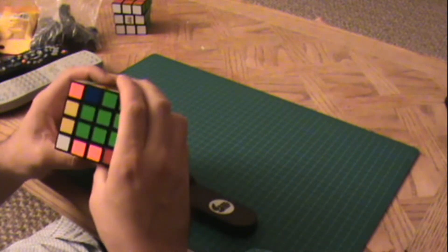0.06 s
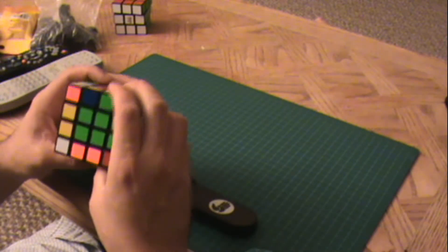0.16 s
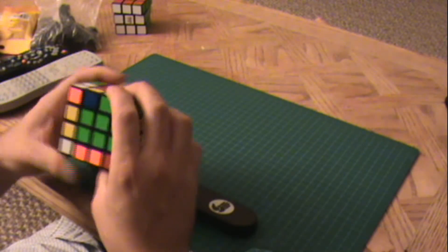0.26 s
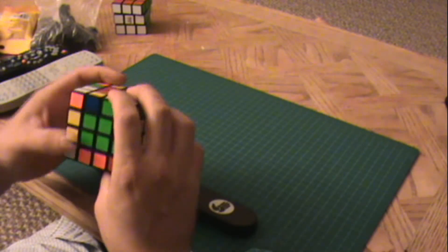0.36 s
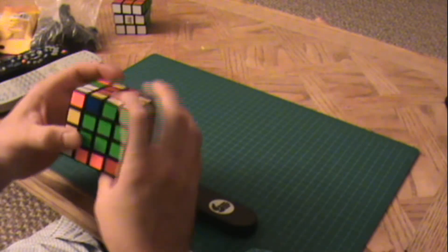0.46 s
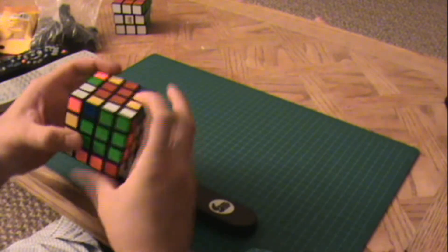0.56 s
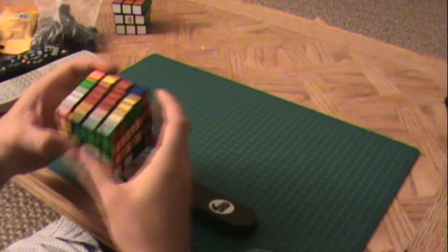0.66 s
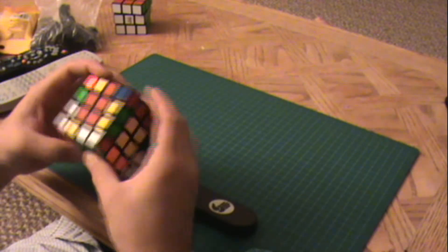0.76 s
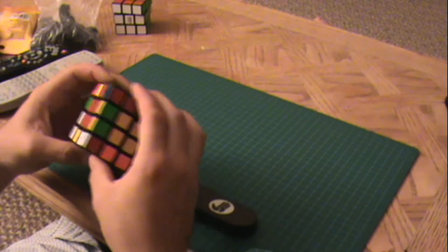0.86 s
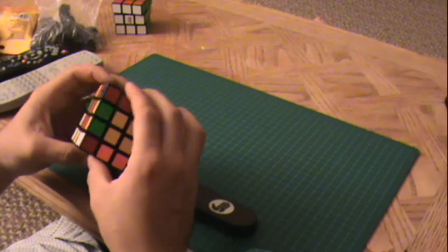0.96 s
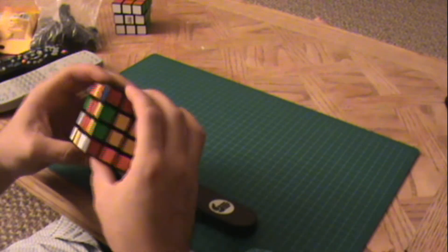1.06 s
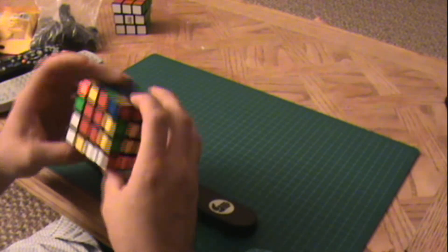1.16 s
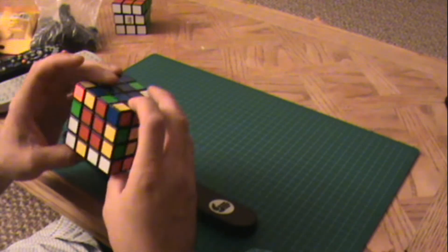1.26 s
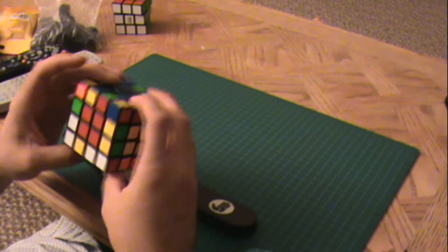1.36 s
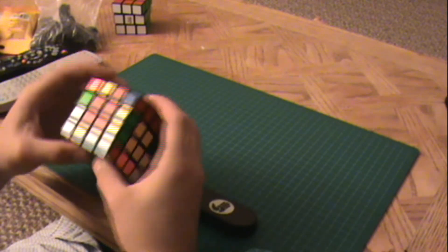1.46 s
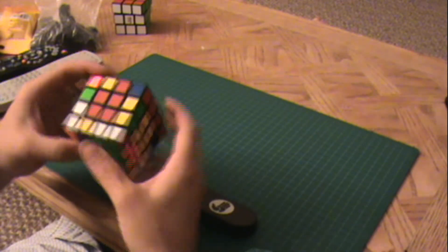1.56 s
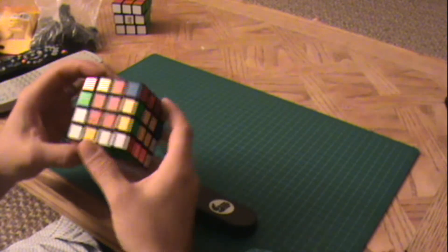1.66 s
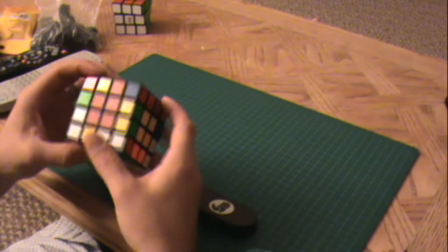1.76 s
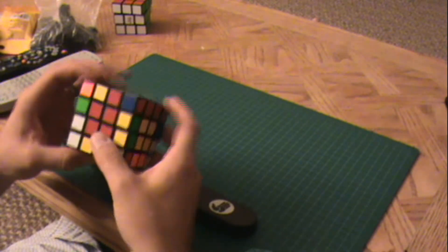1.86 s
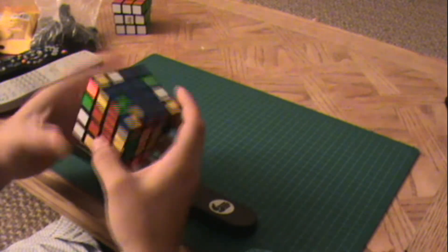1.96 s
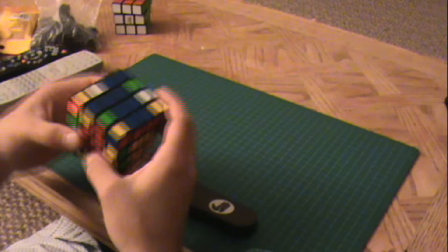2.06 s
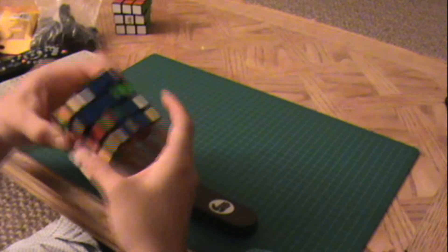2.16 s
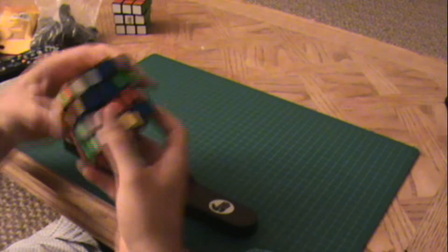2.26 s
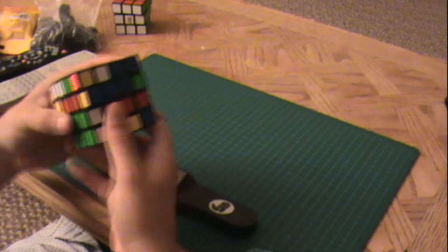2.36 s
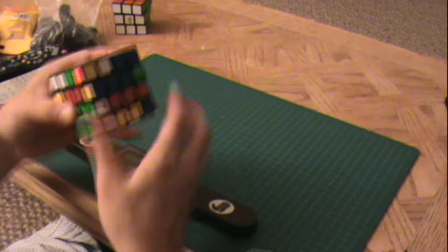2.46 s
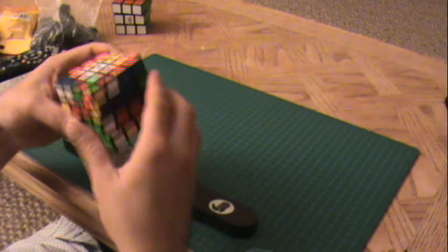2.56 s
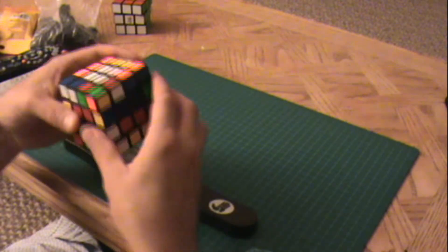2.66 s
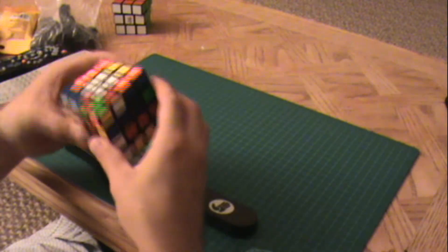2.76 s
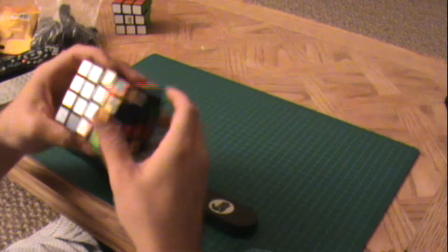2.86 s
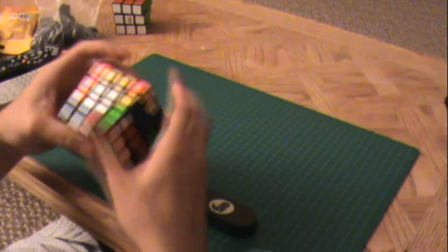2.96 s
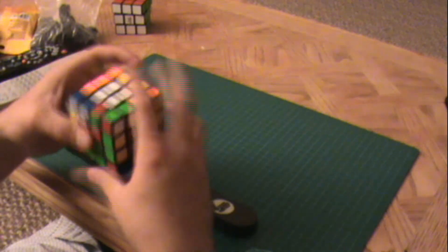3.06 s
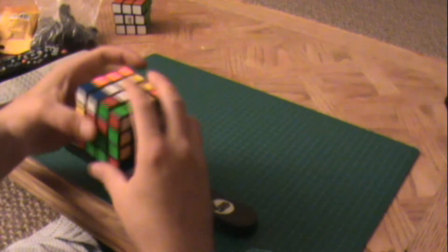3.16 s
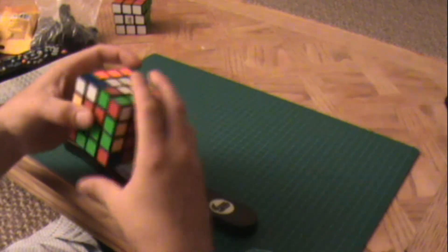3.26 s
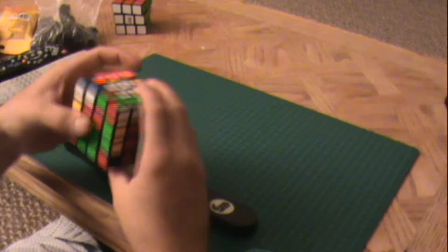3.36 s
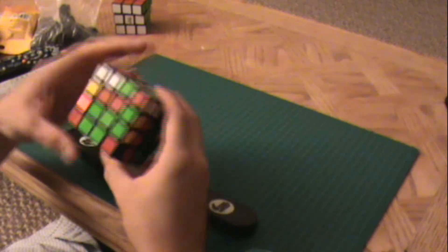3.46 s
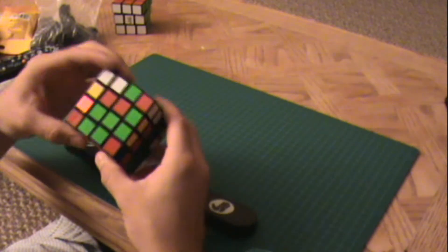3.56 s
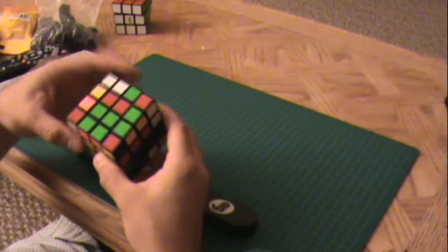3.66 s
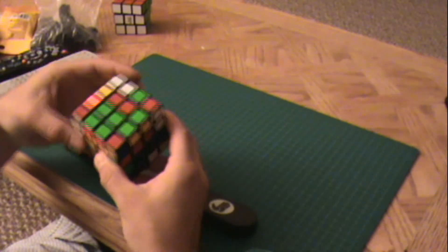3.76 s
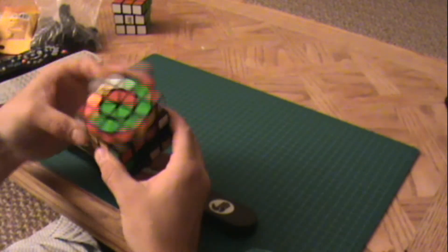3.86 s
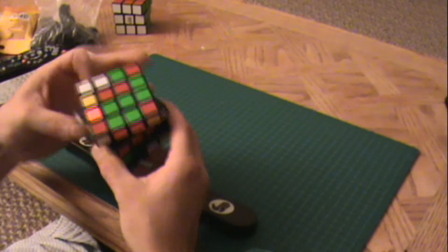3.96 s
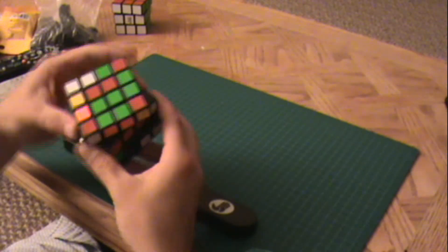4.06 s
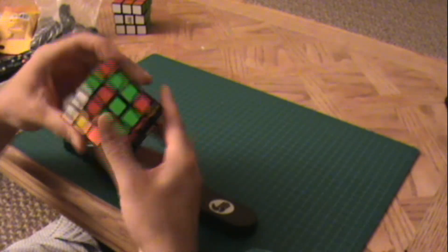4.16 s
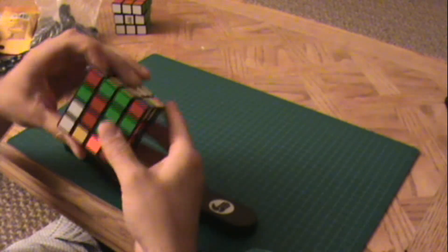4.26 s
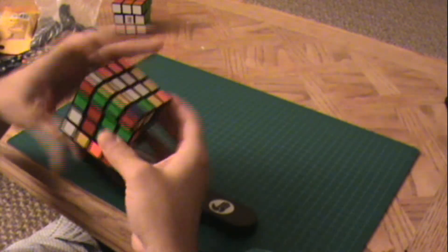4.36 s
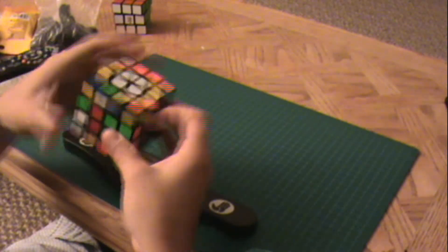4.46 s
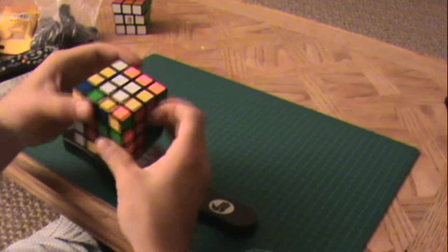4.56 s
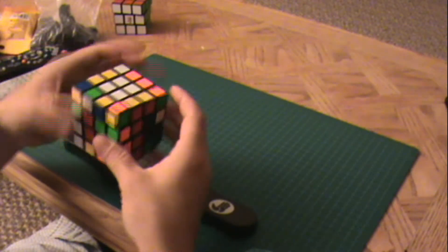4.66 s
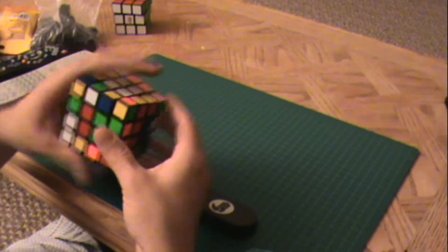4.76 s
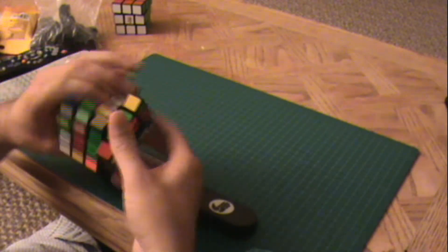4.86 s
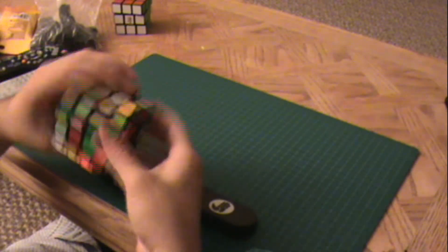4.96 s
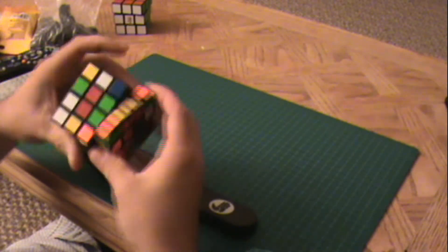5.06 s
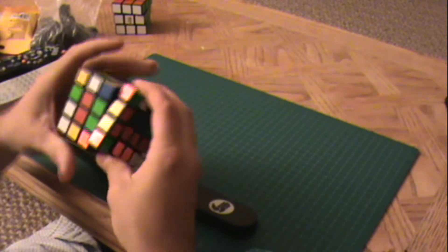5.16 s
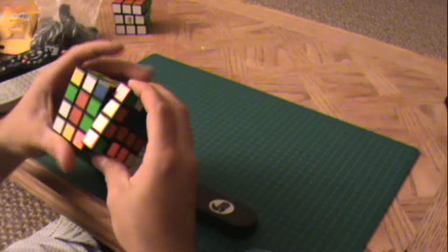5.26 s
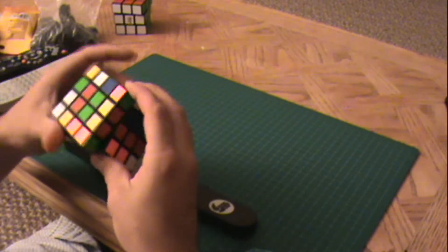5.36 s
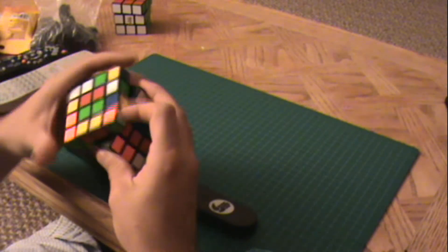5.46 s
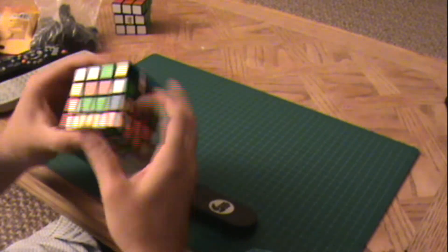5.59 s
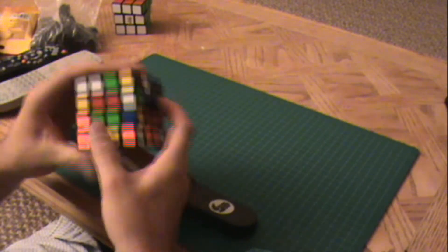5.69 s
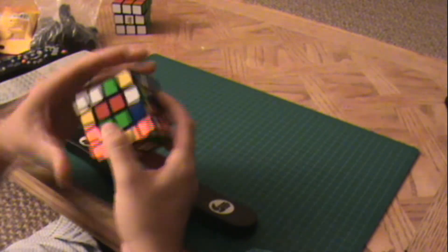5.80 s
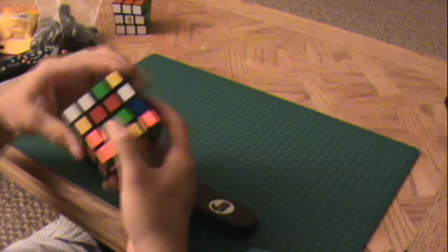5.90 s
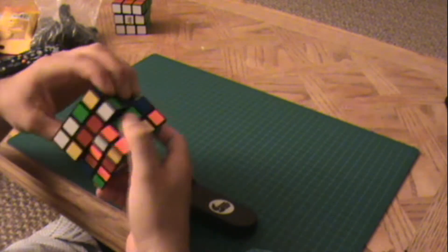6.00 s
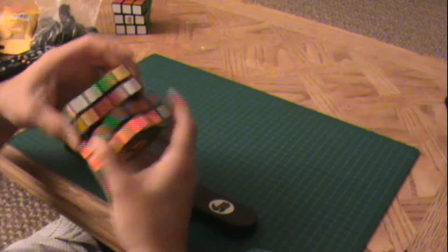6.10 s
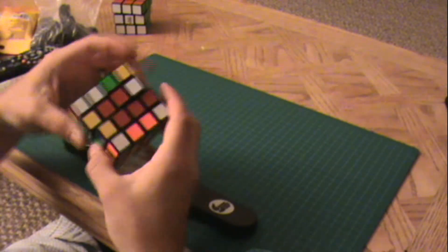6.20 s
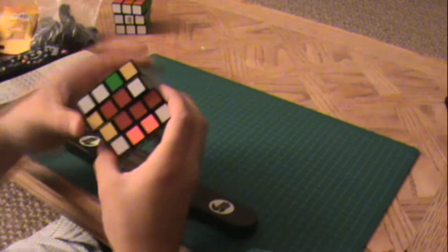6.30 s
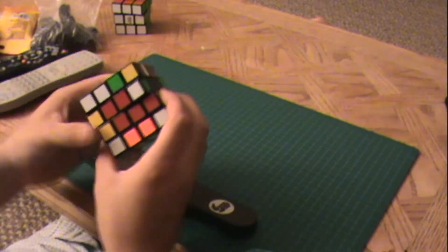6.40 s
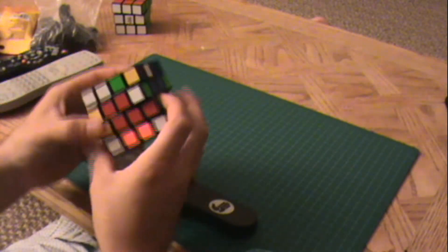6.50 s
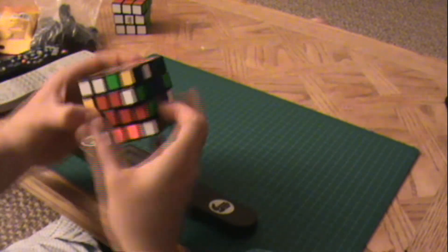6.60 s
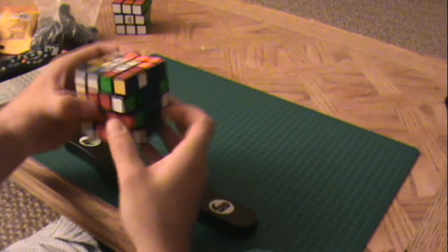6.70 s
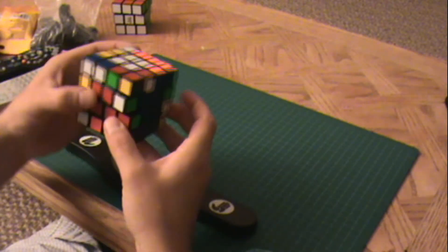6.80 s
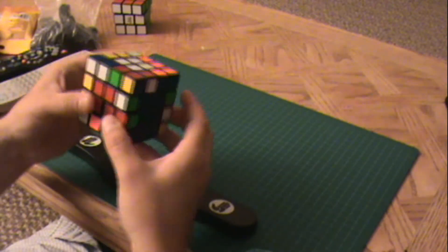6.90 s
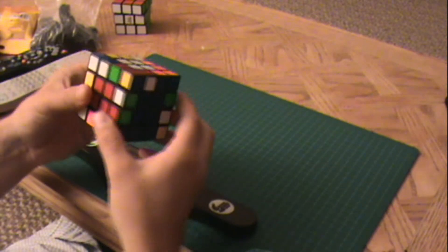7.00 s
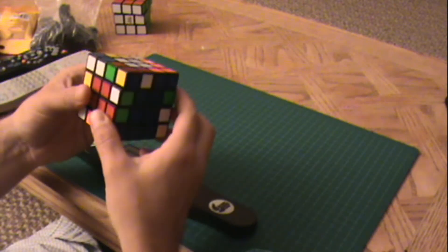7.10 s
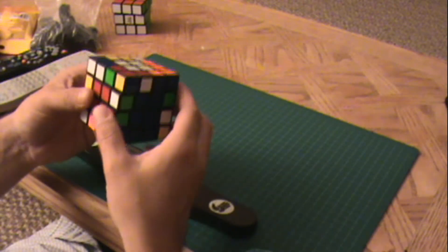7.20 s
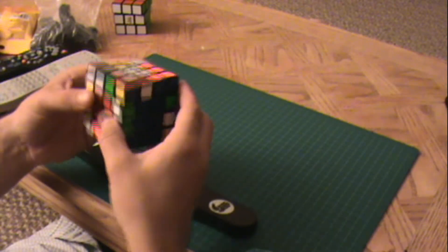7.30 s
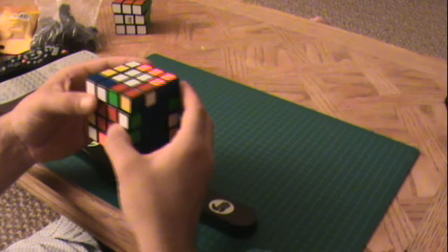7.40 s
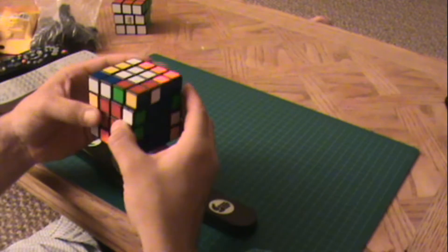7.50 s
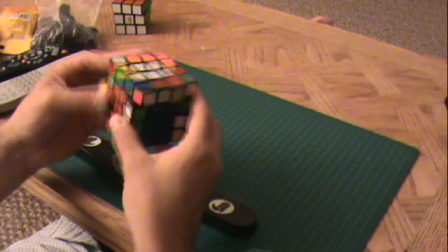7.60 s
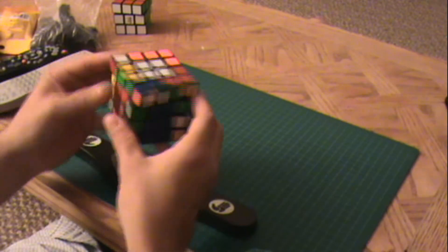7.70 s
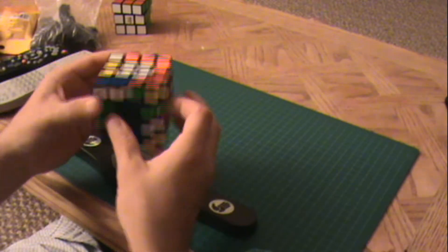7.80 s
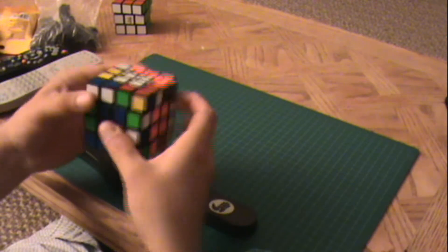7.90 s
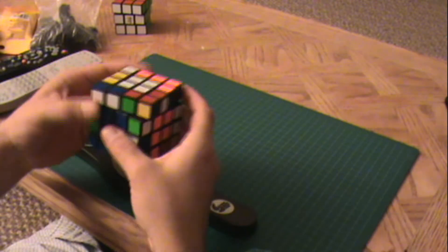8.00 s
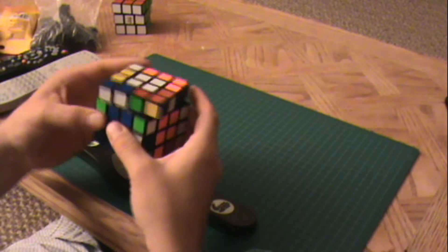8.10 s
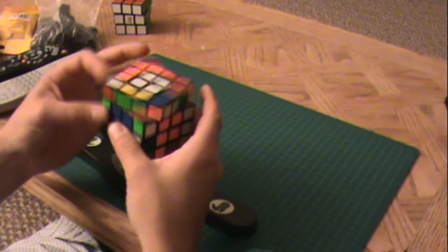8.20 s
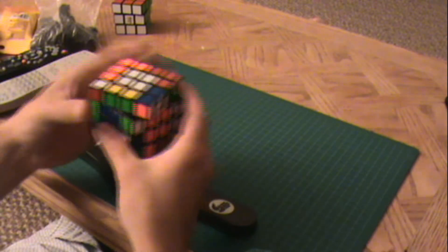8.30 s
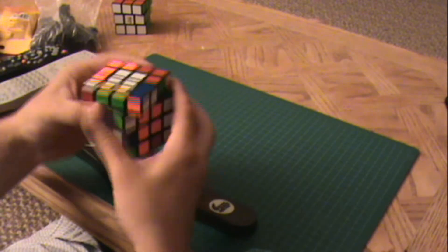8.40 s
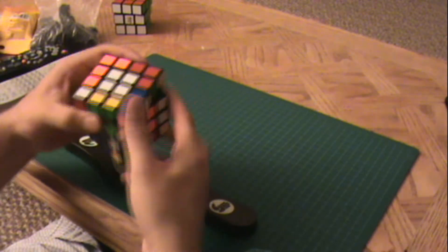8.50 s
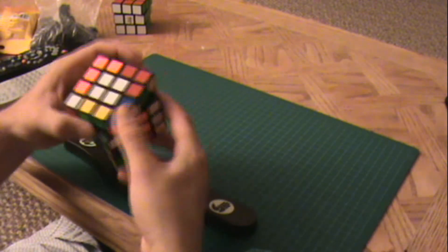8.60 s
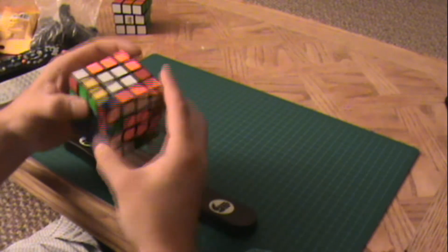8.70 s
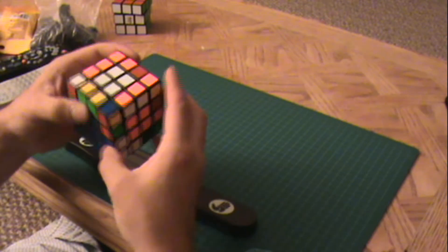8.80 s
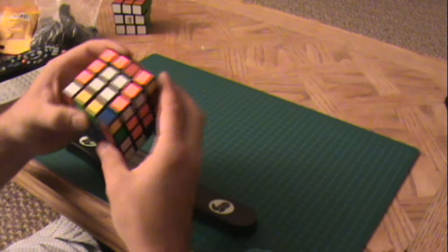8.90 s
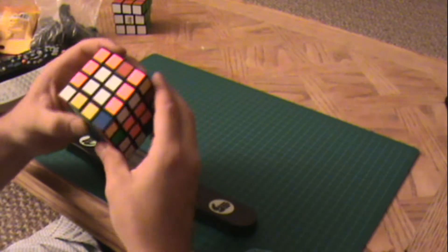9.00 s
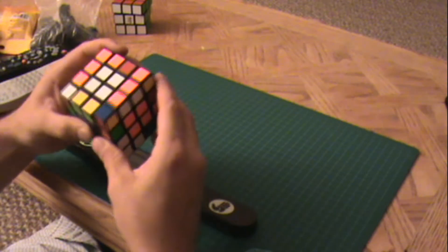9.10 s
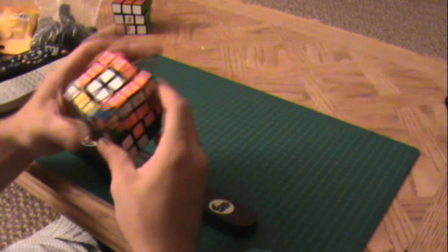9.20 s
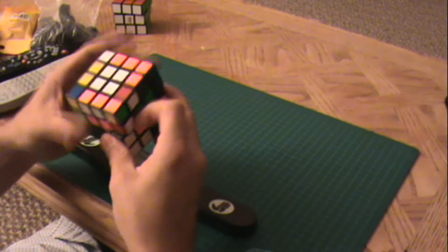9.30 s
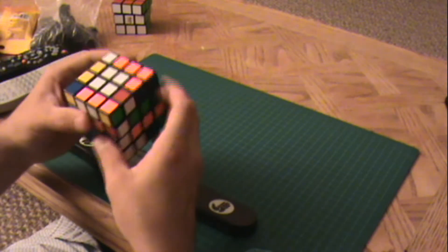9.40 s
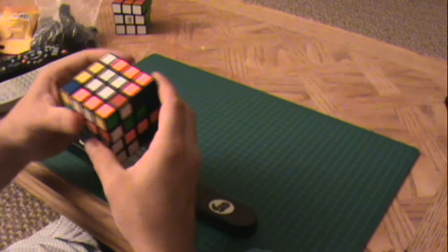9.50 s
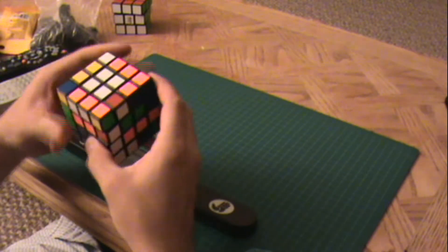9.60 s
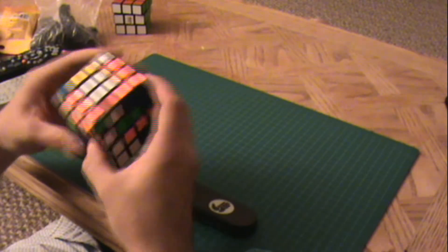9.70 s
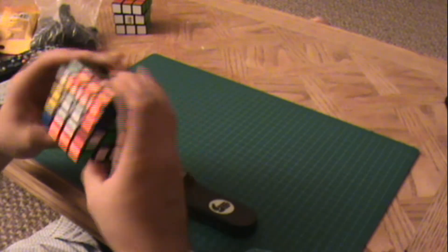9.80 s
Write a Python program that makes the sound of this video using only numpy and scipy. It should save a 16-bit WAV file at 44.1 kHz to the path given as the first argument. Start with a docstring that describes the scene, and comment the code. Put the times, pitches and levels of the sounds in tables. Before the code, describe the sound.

A plastic puzzle cube is turned by hand close to a camcorder, slightly left of centre, in a quiet room. From 0 to 1.9 s there are only light ticks, soft finger drags and small clicks, with a clearer snap at 0.77. Quick clacks gather at 2.0-2.25, then a hard rattling cluster hits at 2.85-2.92. Smaller snaps follow at 3.15-3.45, and a strong pair at 3.97. From 4.5 to 6.2 turns come fast: dense scrapes ending in sharp hollow snaps, loudest around 4.5, 5.06 and 6.15. From 6.3 to 7.6 it is nearly still, with faint loose ticking. Crisp bursts return at 7.65, 8.25 and 8.75, with a tiny pitched ring on a click at 8.49, then a lighter rattle at 9.3 and small clicks to the end. Short reflections follow; faint hum, hiss and a very high thin whine continue throughout.

```python
"""Two hands turn the layers of a plastic puzzle cube in quick runs, close to a camcorder in a quiet room.
Hollow pieces scrape, catch and snap: short noise bursts coloured like plastic, a few with a brief pitched ring.
Between the snaps, layers tick and rub (many tiny noise grains) and fingers drag softly (dull noise).
Echoes and a diffuse tail answer from the table and walls, over low hum, hiss and a thin high whine."""
import sys
import numpy as np
from scipy import signal
from scipy.fft import rfft, irfft, next_fast_len
from scipy.io import wavfile
from scipy.ndimage import uniform_filter1d

SR = 44100
rng = np.random.default_rng(int(sys.argv[2]) if len(sys.argv) > 2 else 0)


def dump_mix(stems):
    """Bounce the given channels to the path in sys.argv[1] as a 16-bit WAV at rate SR."""
    frames = np.atleast_2d(stems).T  # one column per channel
    limited = np.clip(frames, -1, 1)  # hard clip at full scale
    pcm = np.round(limited * 32767).astype(np.int16)
    wavfile.write(sys.argv[1], SR, pcm)


N = 434385

# colour of the plastic pieces: [f/Hz, gain/dB]
PLASTIC_COLOUR = [(130, -23), (200, -16), (310, -4), (500, 0.5), (800, 1.5), (1100, -1.5), (2000, -2.5),
                  (3200, -2), (5000, 0.5), (7000, -2.5), (8800, -4.5), (11000, -9.5), (15500, -24)]


def undb(db):
    """Turn decibels into a gain."""
    return 10 ** (np.asarray(db) / 20)


def level(x, db):
    """Set the rms level (the average strength) in dB."""
    return x * undb(db) / np.sqrt(np.mean(x ** 2))


def response(hz, points):
    """Gain at the given frequencies, joined between [f/Hz, gain/dB] points."""
    f, db = np.transpose(points)
    return undb(np.interp(np.log(hz + 1), np.log(f), db))


def colour(x, points):
    """Make some frequencies stronger and others weaker, following [f/Hz, gain/dB] points."""
    length = x.shape[-1]
    n = next_fast_len(length)
    hz = np.arange(n // 2 + 1) * SR / n
    return irfft(rfft(x, n) * response(hz, points), n)[..., :length]


def walk(rate):
    """Smooth random wandering, with about `rate` new random values a second."""
    hold = int(SR / rate)
    values = rng.standard_normal(N // hold + 1)
    return uniform_filter1d(np.repeat(values, hold), hold)[:N]


def stereo(mid, side, side_db):
    """Left and right from a shared part and a part with opposite signs."""
    return mid + undb(side_db) * side * np.array([[1], [-1]])


def fade(t, t60):
    """Silent before t = 0, then dying away by 60 dB in t60 seconds."""
    return (t >= 0) * np.exp(-np.log(1000) * np.abs(t) / t60)


def add(track, s, sound):
    """Mix a sound into a track at s seconds."""
    start = max(int(s * SR), 0)
    part = track[..., start:start + sound.shape[-1]]
    part += sound[..., :part.shape[-1]]


def tone(hz, db, unsteady, waver_rate=9):
    """A steady tone that wavers in level and phase."""
    waver = 1 + unsteady * (walk(waver_rate) + 1j * walk(waver_rate))
    turning_phase = np.exp(2j * np.pi * hz * np.arange(N) / SR)
    return level(np.real(waver * turning_phase), db)


def background(side_db=-6):
    """Room air and hum shared by both microphone ports, plus hiss and a wavering whine of each port's own."""
    # still room and microphone hiss: [f/Hz, gain/dB]
    air_colour = [(25, -12.5), (55, 2), (70, -1.5), (95, -7.5), (160, -9), (350, -10), (500, -15.5),
                  (800, -13.5), (1240, -14), (2500, -16.5), (5000, -22), (9800, -24.5), (15000, -23.5)]
    # appliance hum: [f/Hz, rms level/dB, unsteadiness 0-1]
    hum_tones = [(70, -66.5, 0.28), (119.6, -68.5, 0.07), (348, -73.5, 0.08), (403, -74, 0.33)]
    air_db = -59.5
    whine_hz, whine_db = 15735, -63.5
    mid, side = level(colour(rng.standard_normal((2, N)), air_colour), air_db)
    side = colour(side, [(100, -5.5), (200, 3.5), (700, 12.5), (2000, 9.5), (8000, 4.5), (14000, 3.0)])
    hum = sum(tone(hz, db, unsteady) for hz, db, unsteady in hum_tones)
    whine = np.array([tone(whine_hz, whine_db, unsteady=1.0, waver_rate=14) for _ in range(2)])
    return stereo(mid, side, side_db) + hum + whine


def reflections(t60=0.26, bass_t60=0.54, bass_db=-3, tail_db=-3, build_s=0.0016, side_db=-6):
    """The room's answer for one position of the cube: a few hard echoes, then a diffuse tail whose bass lingers."""
    # first echoes from the table and nearby walls: [delay/s, gain/dB, upper edge/Hz]
    first_echoes = [(.0086, -17, 14000), (0.0095, -17.5, 9100), (0.0117, -20, 9000), (0.0171, -13, 2500),
                    (0.0215, -16, 6000), (0.0256, -26, 8900)]
    # colour of the main tail: [f/Hz, gain/dB]
    tail_colour = [(120, -9), (320, -4.5), (800, 3.5), (1500, 4.5), (4000, 3), (8500, 4), (12000, -1),
                   (16000, 9.5)]
    t = np.arange(SR // 2) / SR
    air, bass = rng.standard_normal((2, 2, len(t)))
    tails = colour(air, tail_colour) * fade(t, t60)
    tails += colour(bass, [(330, bass_db), (1500, -48)]) * fade(t, bass_t60)
    # the tail starts 6 ms late and builds up quickly
    tails *= np.clip((t - .006) / build_s, 0, 1)
    tails *= undb(tail_db) / np.sqrt(np.sum(tails ** 2, axis=1, keepdims=True))
    paths = stereo(tails[0], tails[1], side_db)
    for delay, db, edge_hz in first_echoes:
        # a one-pole low-pass dulls each echo above its upper edge
        pole = np.exp(-2 * np.pi * edge_hz / SR)
        add(paths, delay, undb(db) * (1 - pole) * pole ** np.arange(SR // 1000))
    return paths


def room(radiated, count=20):
    """The hands keep moving and tilting the cube, so each short stretch meets a different tail."""
    out = np.zeros((2, N))
    for stretch in np.array_split(np.arange(N), count):
        answer = signal.oaconvolve(radiated[None, stretch], reflections(), axes=1)
        add(out, stretch[0] / SR, answer)
    return out


def ports(sound, left_db=1.6, lead_db=-6):
    """The cube is left of centre: the left port is a little louder and leads in the low middle."""
    # a quarter-cycle shift at every frequency, added with opposite signs, moves the two ports apart in time
    turned = -np.imag(signal.hilbert(sound.mean(axis=0), next_fast_len(N)))[:N]
    lead = colour(turned, [(150, -9), (550, -1.5), (1050, -3.5), (3000, -8), (10000, -10)])
    return stereo(sound, lead, lead_db) * undb(np.array([[left_db], [-left_db]]) / 2)


def strokes(rows, attack_s, swell_db, t60):
    """Strength of hand movements: each sets in, changes by swell_db over its length, then dies away."""
    power = np.zeros(N)
    for start, length, db in rows:
        t = np.arange(int((length + t60) * SR)) / SR
        attack = np.minimum(t / attack_s, 1)
        push = undb(db + swell_db * np.minimum(t / length - 1, 0))
        release = fade(np.maximum(t - length, 0), t60)
        add(power, start, (attack * push * release) ** 2)
    return np.sqrt(power)


def fingers(flutter_db=4):
    """Skin drags on the cube in soft, dull, uneven strokes."""
    # the fingers take a new hold: [start/s, length/s, relative level/dB]
    new_holds = [(.55, 0.3, -58.5), (1.15, 0.21, -69), (2.45, 0.63, -75), (4.15, 0.49, -65.5),
                 (8.0, 0.35, -68), (8.85, 0.3, -73)]
    hold_db = -72.5  # a faint drag that never stops
    skin = colour(rng.standard_normal(N),
                  [(100, -9), (200, -11), (320, -2.0), (600, -5), (1300, -18.0), (9000, -58)])
    uneven = level(skin * undb(flutter_db * walk(25)), 0)
    return uneven * (strokes(new_holds, attack_s=0.054, swell_db=2, t60=0.66) + undb(hold_db))


def sliding(tick_rate, spread_db, tick_t60, rub_db, slide_db):
    """Layers slide over each other: tiny slips of very unequal size, each with a short ring, over a fine rub."""
    happens = rng.random(N) < tick_rate / SR  # tick_rate slips a second on average
    slips = happens * undb(spread_db * np.minimum(rng.exponential(size=N), 3))
    # every slip leaves a short fading trail of power
    keep = np.exp(-2 * np.log(1000) / (tick_t60 * SR))
    power = signal.lfilter([1], [1, -keep], slips ** 2)
    strength = np.sqrt(power / power.mean() + undb(rub_db) ** 2)
    grain = strength * rng.standard_normal(N)
    return level(colour(grain, PLASTIC_COLOUR), slide_db)


def nudging():
    """Slow shifts give sparser, duller ticks; the loose pieces are never quite still."""
    # the layers are nudged into line and tick loosely: [start/s, length/s, relative level/dB]
    nudges = [(.24, 0.087, -56.5), (.53, 0.18, -61), (1.55, .16, -58), (2.0, 0.25, -55), (2.4, 0.24, -51.5),
              (2.68, 0.15, -57), (3.17, 0.14, -60), (3.62, 0.31, -54), (4.05, 0.14, -57.5),
              (4.19, 0.13, -50.5), (4.39, 0.06, -48), (4.63, .11, -50.5), (4.9, 0.15, -50.5),
              (5.51, 0.14, -48.5), (6.46, 0.12, -59.5), (6.7, .19, -61), (6.97, 0.073, -53),
              (7.3, .08, -67), (7.5, 0.3, -55), (7.81, .31, -58), (8.4, 0.066, -51.5), (8.65, 0.049, -47),
              (8.95, 0.218, -61.5), (9.16, 0.15, -59), (9.38, 0.06, -46.5), (9.58, .15, -55)]
    loose_db = -64.5  # ticking that never stops
    ticks = sliding(tick_rate=230, spread_db=5.0, tick_t60=0.012, rub_db=-11, slide_db=-1)
    ticks = colour(ticks, [(700, 1.5), (3000, -1.5), (9000, -5.5)])
    return ticks * (strokes(nudges, attack_s=0.0035, swell_db=-2.5, t60=0.066) + undb(loose_db))


def turning():
    """A fast turn drags the pieces past each other in a dense rattle."""
    # a layer is flicked round and scrapes harder until it seats: [start/s, length/s, relative level/dB]
    turns = [(1.92, 0.032, -46), (2.205, 0.047, -36.5), (2.86, 0.075, -33.5), (3.89, 0.071, -39.5),
             (4.484, 0.051, -32), (4.85, 0.033, -37.5), (5.05, 0.062, -31), (5.39, 0.048, -39.5),
             (5.63, 0.032, -39.5), (5.745, 0.046, -40), (5.96, 0.057, -34), (6.135, 0.04, -34),
             (7.64, 0.064, -35), (8.22, 0.041, -32.5), (8.72, 0.038, -33), (9.29, 0.06, -36)]
    rattle = sliding(tick_rate=520, spread_db=4.5, tick_t60=0.0065, rub_db=-8, slide_db=1.5)
    return rattle * strokes(turns, attack_s=.006, swell_db=6.5, t60=0.16)


def contact(t, snap_t60, ring_t60=0.084, ring_db=-17, rebound=0.75, play_s=.0042,
            scrape_db=-22, scrape_t60=0.027, count=4):
    """Spectrum of one contact: an edge scrapes up to the catch, snaps, and chatters a few times in its play."""
    late, force = rng.random((2, count, 1))
    power = fade(t, snap_t60) ** 2
    power += (undb(ring_db) * fade(t, ring_t60)) ** 2
    chatter = rebound * force * fade(t - late ** 2 * play_s, snap_t60)
    power += np.sum(chatter ** 2, axis=0)
    # time runs backwards here, so the scrape grows towards the catch
    power += (undb(scrape_db) * fade(-t, scrape_t60)) ** 2
    # the many interlocked pieces have modes so dense and damped that they ring as noise
    burst = np.sqrt(power) * rng.standard_normal(len(t))
    return rfft(burst / np.sqrt(np.sum(burst ** 2)))


def clicks(click_db=30.0, body_t60=0.0085, edge_t60=0.0065, piece_db=2.0, evenness=0.5,
           ping_t60=0.0079, size=2048):
    """All snaps of piece on piece, as sent towards the microphone (row 0) and into the room (row 1)."""
    # pieces snapping against each other:
    # [t/s, level before click_db is added/dB, hollow body relative/dB, bright edge relative/dB]
    snap_rows = [(.3329, -49.5, -2, -5), (.4442, -45.5, -1, 0), (.4868, -47.5, 2, 6),
                 (0.6902, -48.5, 5.5, -14), (.7563, -44, 11.5, 8), (.7656, -30, -26, 0.5),
                 (1.1952, -44, 4, 5.5), (1.266, -48.5, 5, -2), (1.3206, -43, -0.5, -5.5),
                 (1.4755, -52, -6, -3), (1.5563, -43, -3, 5), (1.6134, -36.5, 0.5, 1.5),
                 (1.7032, -39, 7.5, -1.5), (1.8593, -45.5, 1.5, 5.5), (1.9726, -30.5, 0, 1.5),
                 (2.0933, -33, -4, 1.5), (2.1376, -37.5, 3.5, -1.5), (2.2125, -32, -3, 3),
                 (2.2283, -30, 1, 3), (2.2488, -26.5, 0.5, -3), (2.464, -40.5, -8, -4),
                 (2.617, -40.5, -11, 1.5), (2.7715, -43.5, 2, -13), (2.8427, -45, 3, -14),
                 (2.854, -38, -1, -3), (2.862, -27.5, -0.5, -3), (2.868, -29.5, -16, -3),
                 (2.894, -20, -1, 1), (2.9132, -27, -14, 8), (2.923, -21.5, 5, 3), (3.1546, -31, -17, 8),
                 (3.1719, -30, 2.5, -2), (3.2935, -44, 4, -6), (3.4278, -30.5, 1, 1), (3.4549, -33, 2, 6.5),
                 (3.6965, -42, -3, -3), (3.7451, -42, 3, -2), (3.8332, -40.5, 4.5, -9),
                 (3.8947, -40, 5, -15), (3.9649, -23.5, 0.5, 4.5), (3.978, -24.5, 3, 4.5),
                 (4.1646, -36, 3, -0.5), (4.4874, -25.5, 2, 6), (4.4936, -23, 1, 6),
                 (4.5116, -18.5, -3, 3.5), (4.5287, -21.5, 0, 5), (4.6195, -33, -2, -1),
                 (4.7416, -28.5, 1, 3), (4.8551, -30, -2.5, 3), (4.861, -25.5, -23, 0),
                 (4.8672, -31.5, 0.5, 6), (4.9215, -31, 7, 4.5), (5.0272, -32.5, -1, -2),
                 (5.0555, -20.5, -3, 3), (5.0806, -23, -7, 6), (5.0983, -25, -4, 5.5),
                 (5.137, -28, 0.5, -4), (5.222, -38.5, 3, -8), (5.3898, -38, 1.5, 3),
                 (5.4266, -24.5, -0.5, 2), (5.5084, -27.5, 3, 1), (5.5392, -32, -10, -3),
                 (5.6733, -41, -2, -9), (5.7934, -32, -14, -2.5), (5.9639, -40, -2, -16),
                 (6.0224, -23.5, 4, -6.5), (6.139, -22.5, -2, 2), (6.1612, -19, -4, -1),
                 (6.1755, -25.5, -2.5, 1), (6.2043, -28, -3, 0.5), (6.3094, -41, 4, -6),
                 (6.4644, -41.5, 3.5, 2), (6.586, -48.5, -4, -12), (6.6832, -45, 5, 1),
                 (6.7327, -44.5, 5, -4), (6.8887, -42, -5, -3), (7.3647, -51.5, 2, -6),
                 (7.5265, -49, 6, -2), (7.6201, -44, 4, -3), (7.6311, -33, 2, 0), (7.6442, -23.5, 1.5, 3),
                 (7.6641, -23, -2, 2.5), (7.6885, -20.5, -1, 1), (7.6924, -26, -8, 14.5),
                 (7.8295, -37, -7, -3), (7.9, -39, 0, 0.5), (7.9639, -46.5, 0, 3), (8.0288, -40, 3, -1),
                 (8.1157, -49.5, -7, 0), (8.1969, -43, 7.5, -3), (8.2248, -26.5, -3, -4),
                 (8.25, -23.5, -0.5, 2), (8.276, -27.5, 0, -1), (8.2855, -30.5, -4, -3),
                 (8.4661, -40, -4, 3), (8.4908, -28, 0.5, 3), (8.629, -40, -2, 2), (8.7381, -33.5, -2.5, 2),
                 (8.7583, -21, 2, 4), (8.7702, -21.5, -6, 5), (8.9945, -39, -12, -3),
                 (9.1842, -43.5, 2, -9), (9.2765, -36, 0, -3), (9.3236, -27, -4.5, 8),
                 (9.4806, -44.5, 3.5, 6.5), (9.6261, -39.5, -1, -5), (9.6784, -39.5, -3.5, -9),
                 (9.765, -47.5, 3, 2), (9.7942, -36.5, 0.5, 2)]
    # the cube's springs ping briefly at their own pitch: [t/s, f/Hz, starting peak level/dB]
    ping_rows = [(1.8593, 3170, -30.5), (8.4908, 4760, -18), (8.49, 5500, -20)]
    out = np.zeros((2, N))
    t = (np.arange(size) - size // 4) / SR  # room for the scrape before the catch at t = 0
    hz = np.arange(size // 2 + 1) * SR / size
    edge_share = 1 - 1 / (1 + (hz / 5500) ** 4)  # the edge takes over in the treble
    for s, db, hollow_db, bright_db in snap_rows:
        tilt = [(800, hollow_db), (2200, 0), (4500, 0), (8000, bright_db)]
        # every piece has its own broad resonances
        piece = np.column_stack([np.geomspace(400, 14000, 24), piece_db * rng.standard_normal(24)])
        # the hollow body rings longer than the hard edge
        body = np.sqrt(1 - edge_share) * contact(t, body_t60)
        edge = np.sqrt(edge_share) * contact(t, edge_t60)
        snap = body + edge
        # one direction has peaks and dips; summed over all directions they partly even out
        all_round = snap / (np.abs(snap) + 1e-9) ** evenness
        beams = np.array([snap, all_round])
        gain = undb(db + click_db) * response(hz, PLASTIC_COLOUR) * response(hz, tilt) * response(hz, piece)
        add(out, s + t[0], irfft(beams * gain))
    for s, pitch, db in ping_rows:
        add(out, s + t[0], undb(db) * fade(t, ping_t60) * np.sin(2 * np.pi * pitch * t))
    return out


def scene():
    """Snaps, sliding and finger noise in the room, over its quiet background."""
    direct, radiated = clicks() + turning() + nudging() + fingers()
    return ports(direct + room(radiated)) + background()


def record(dry):
    """The camcorder rounds the sharpest peaks and cuts the top."""
    ceiling, top_hz = .55, 16100
    rounded = ceiling * np.tanh(dry / ceiling)
    return signal.sosfilt(signal.ellip(10, .2, 70, top_hz, fs=SR, output="sos"), rounded)


dry = scene()
out = record(dry)
dump_mix(out)
```